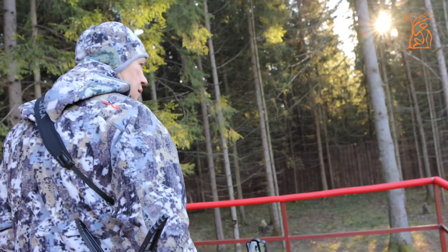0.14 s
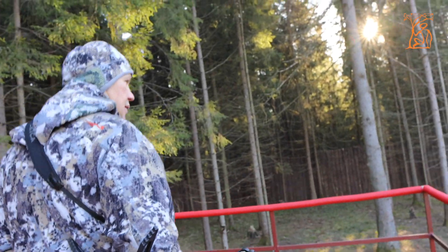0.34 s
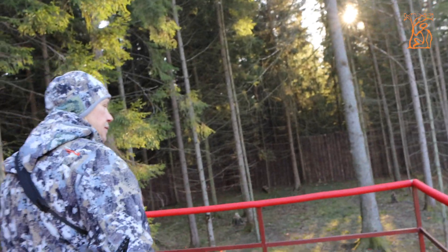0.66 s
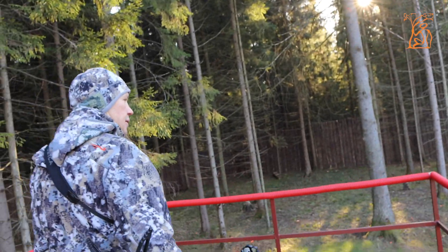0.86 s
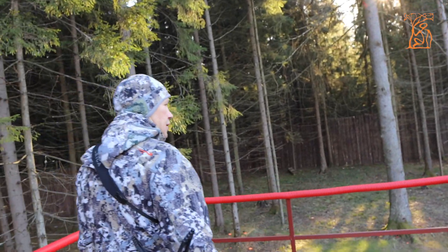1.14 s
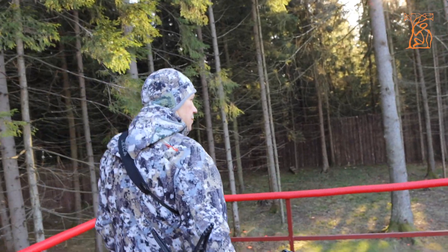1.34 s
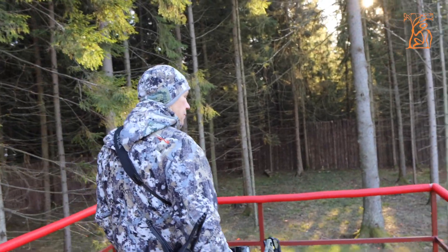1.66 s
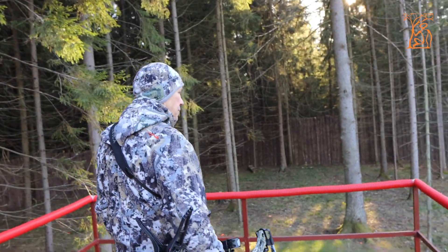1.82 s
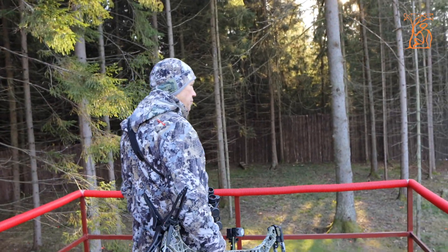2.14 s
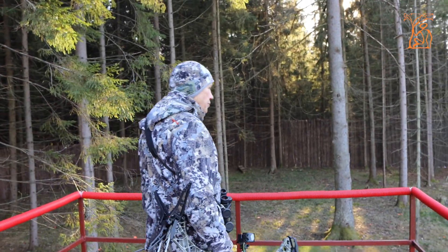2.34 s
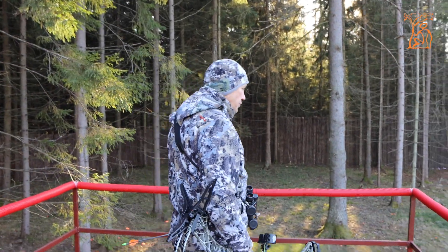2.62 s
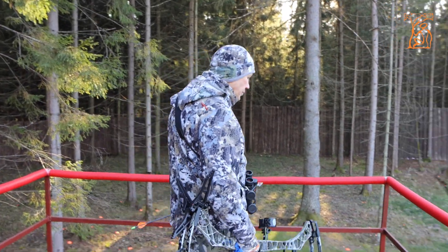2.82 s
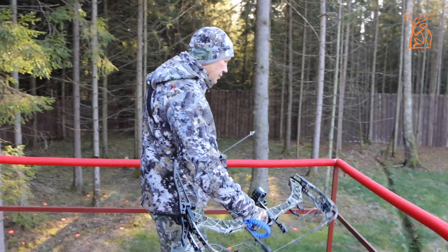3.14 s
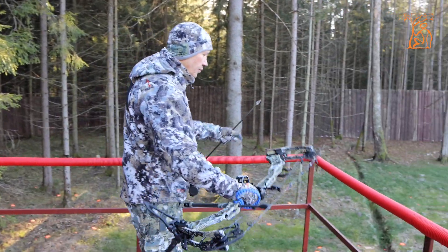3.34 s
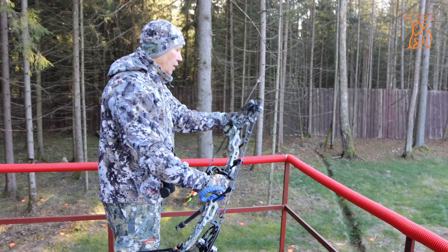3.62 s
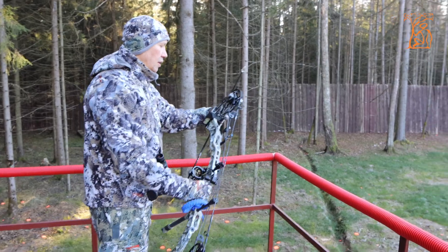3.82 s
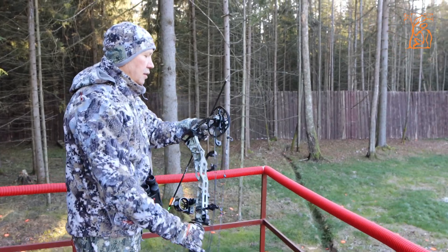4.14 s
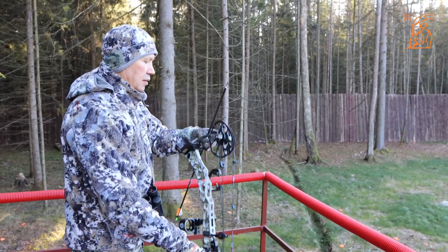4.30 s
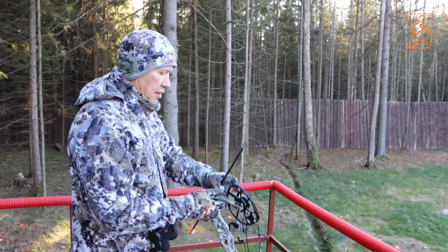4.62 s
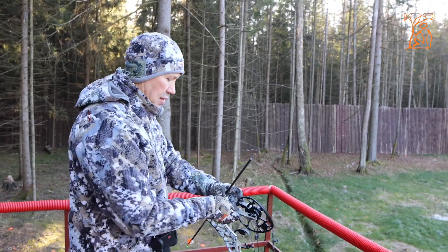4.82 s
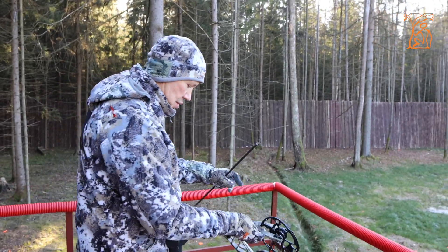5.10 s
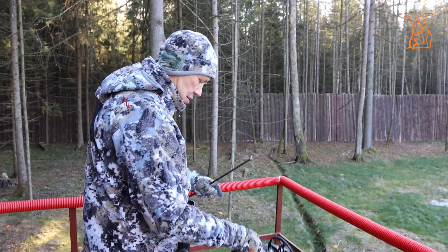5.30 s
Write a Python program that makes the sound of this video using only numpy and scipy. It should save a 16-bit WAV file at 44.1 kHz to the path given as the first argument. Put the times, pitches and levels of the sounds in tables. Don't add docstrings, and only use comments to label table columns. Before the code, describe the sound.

Irregular knocks, ticks and scuffs of boots and equipment on boards among trees, as a distant bang's echo fades beneath.

```python
import sys
import numpy as np
from scipy import signal
from scipy.fft import rfft, irfft, next_fast_len
from scipy.io import wavfile
from scipy.ndimage import uniform_filter1d, minimum_filter1d

SR = 44100
rng = np.random.default_rng(int(sys.argv[2]) if len(sys.argv) > 2 else 0)


def invert_db(level):
    return 10 ** (np.asarray(level, dtype=float) / 20)


def to_wav(sig):
    pcm = np.clip(np.atleast_2d(sig), -1, 1) * 32767
    pcm = np.round(pcm).astype(np.int16)
    wavfile.write(sys.argv[1], SR, pcm.T)


N = 240653

EDGES = 22 * 2 ** np.arange(0, 9.6, .5)
DULL_HZ = 1500
# t/s, peak level/dB,
# f/Hz, t60/s
THUDS = [(0.395, -16.5, 92, 0.1), (0.551, -7, 145, 0.058), (1.421, -22, 273, 0.27),
         (1.767, -18, 125, 0.096), (1.907, -12, 110.5, 0.052), (1.987, -16, 72.4, 0.046),
         (3.212, -31, 99.6, 0.12), (4.206, -21, 121, 0.078), (4.214, -13, 85, 0.076),
         (4.237, -19.5, 266, 0.1), (4.259, -24, 104, 0.062), (4.354, -16.5, 95.3, 0.15),
         (4.373, -7.5, 147, 0.031), (4.387, -29, 105, 0.12), (4.423, -20, 143, 0.16),
         (4.748, -19.5, 96, 0.14), (4.85, -11, 74, 0.058), (4.601, -19.5, 61, 0.13), (4.978, -27, 67, .15)]


def rms_one(x):
    return x / np.sqrt(np.mean(x ** 2) + 1e-20)


def at_hz(points, hz):
    table_hz, value = np.transpose(points)
    return np.interp(np.log(hz), np.log(table_hz), value)


def drift(rate):
    r = np.exp(-80 * np.pi * rate / SR)
    noise = rng.standard_normal(N // 40 + 2002)
    slow = signal.lfilter([1], [1, -2 * r, r * r], noise)[2000:]
    return np.interp(np.arange(N) / 40, np.arange(len(slow)), rms_one(slow))


def band(x, low, high):
    return signal.sosfilt(signal.butter(2, [low, high], "band", fs=SR, output="sos"), x + 1e-18)


def spread(pair, hz):
    # f/Hz, likeness [0-1]
    likeness = [(30, 1), (70, 0.99), (130, 1), (250, 0.97), (600, 0.9), (1400, 0.56), (2800, 0.43),
                (5000, 0.49), (12000, 0.57)]
    alike = np.clip(at_hz(likeness, hz), 0, 1)
    shared = np.sqrt(1 + alike) * pair[0]
    opposed = np.sqrt(1 - alike) * pair[1] * [[1], [-1]]
    return (shared + opposed) / np.sqrt(2)


def grit(shape, spread_db):
    size_db = spread_db * np.minimum(rng.exponential(1, shape[-1]), 5)
    return rng.standard_normal(shape) * invert_db(size_db)


def layer_gain(spectrum, hz, low, high):
    gains = invert_db(at_hz(spectrum, hz))
    lift = np.sqrt(1 + (np.tan(np.pi * hz / SR) / np.tan(np.pi * DULL_HZ / SR)) ** 4)
    inside = (hz > low) & (hz < high)
    power = np.sum((gains ** 2 * hz)[inside]) * 0.7 / SR
    return lift * gains / np.sqrt(power)


def backgrounds():
    # t/s, level/dB
    bang = [
        (0.0, -15.5),
        (0.11, -12),
        (0.135, -17),
        (0.46, -20),
        (0.7, -24.5),
        (1.22, -29),
        (1.7, -32),
        (2.4, -44),
        (5.457, -70),
    ]
    bang_top_db, bang_top_loss_db_per_s, bang_top_tilt_db = -10, 9.5, -19.5
    # t/s, effort level/dB, crispness of the folds/dB
    motion = [(0.0, -54.5, 17), (0.6, -52, 6), (0.85, -63.5, 4), (1.1, -58, 9.5), (1.36, -49, 8.5),
              (1.7, -60, 8.5), (1.9, -37.5, -8), (2.3, -44.5, 1.5), (2.46, -52.5, -4), (2.8, -50, 8.5),
              (3.1, -60.5, 4), (3.262, -65.5, 17), (3.33, -44.5, 5.5), (3.79, -44.5, -8), (3.83, -45, -7),
              (4.28, -46, 3), (4.73, -53, -2.5), (5.457, -63.5, 9)]
    # f/Hz, density/dB
    rumble_spectrum = [(13, -34), (22, -14.5), (44, 0), (212, -4.5), (341, -12), (433, -16.5), (494, 0),
                       (594, -28), (1460, -62), (1710, -34.5), (12000, -58.5), (15600, -96.5),
                       (22000, -120)]
    # f/Hz, density/dB
    echo_spectrum = [(71, -48.5), (120, -22), (221, -10.5), (452, 3), (625, 0), (767, -2.5), (924, -3.5),
                     (2320, -27), (7000, -76), (9100, -88.5), (15400, -120)]
    # f/Hz, density/dB
    rustle_spectrum = [(500, -14), (1100, 9), (2000, 3.5), (3200, -6.5), (4500, -9.5), (7000, -23),
                       (12000, -32), (16000, -54.5)]
    rumble_db, creak_db, woods_db = -34.5, 7.5, -40.5
    drag_hz, drag_db = 2820, 3

    t = np.arange(N) / SR
    bang_db = np.interp(t, *np.transpose(bang))
    s, *columns = np.transpose(motion)
    effort_db, crisp_db = [np.interp(t, s, c) for c in columns]
    low_gain = np.hypot(invert_db(rumble_db), shudder())
    mid_gain = np.sqrt(invert_db(bang_db) ** 2 + invert_db(effort_db + creak_db) ** 2 + invert_db(woods_db) ** 2)
    top_db = bang_db + bang_top_db - bang_top_loss_db_per_s * t

    hz = np.sqrt(EDGES[1:] * EDGES[:-1])
    rumble = layer_gain(rumble_spectrum, hz, 40, 250)
    echo = layer_gain(echo_spectrum, hz, 350, 1100)
    rustle = layer_gain(rustle_spectrum, hz, 1500, 3500)
    smooth = rng.standard_normal((2, 2, N))
    cloth = rms_one(grit((2, 2, N), spread_db=1.5)) * invert_db(2.06 * drift(50))
    out = 0
    for k, centre in enumerate(hz):
        far = np.hypot(rumble[k] * low_gain, echo[k] * mid_gain * invert_db(-2.0))
        far = far * invert_db(0.68 * drift(11))
        share = np.clip(np.log2(centre / 2800), 0, 1)
        folds = np.hypot(invert_db(effort_db + share * crisp_db), invert_db(top_db + share * bang_top_tilt_db))
        treble_share = np.clip(np.log2(centre / 1100) / 1.7, 0, 1.3)
        sing_db = drag_db * np.exp(-(np.log2(centre / drag_hz) / .6) ** 2)
        near = rustle[k] * np.hypot(folds * invert_db(-2.5), scuffing(treble_share) * invert_db(sing_db))
        noise = smooth[k % 2] * far + cloth[k % 2] * near
        out = out + spread(band(noise, *EDGES[k:k + 2]), centre)
    return signal.sosfilt(signal.butter(2, DULL_HZ, fs=SR, output="sos"), out)


def knocks():
    # t/s, peak level/dB,
    # hollowness/dB, crispness/dB, t60/s
    blows = [(0.0004, -24.5, 4, -1.5, 0.036), (0.4075, -19, 2.5, -33, 0.021),
             (0.5472, -6.5, 7.5, -15, 0.025), (0.5524, -20, 2, -4, 0.045), (1.3134, -22, -1, -15, 0.056),
             (1.4282, -12.5, -2, -24.5, 0.05), (1.4344, -19.5, 2, -9, 0.015),
             (1.7229, -25.5, -3, -11.5, 0.049), (1.8587, -18.5, -1, -13, 0.052),
             (2.0074, -18, -32, -6.5, 0.03), (2.1454, -3.5, -8.5, -12, 0.041),
             (2.151, -1, -11.5, -20.5, 0.047), (2.1864, -14.5, -11, -12, 0.059),
             (2.1909, -17.5, -10, -4.5, 0.023), (2.2213, 3.5, -17, -21.5, 0.021),
             (2.2284, -10.5, -5, -16, 0.049), (2.7132, -8, -10.5, -17.5, 0.072),
             (3.3403, -20, -8.5, -15, 0.031), (3.3578, -24, -19, -17.5, 0.069),
             (3.5885, -5, -14.5, -6.5, 0.027), (4.1824, -14.5, 0.5, -15, 0.081),
             (4.1902, -14, -14, -13.5, 0.021), (4.1964, -10.5, 2, -14, 0.031),
             (5.4138, -17.5, -14, -9, 0.061)]
    # t/s, peak level/dB, hollowness/dB, crispness/dB
    ticks = [(0.5036, -28, 1.5, -30), (0.5344, -26, 6, -21), (0.579, -21, 3.5, -21),
             (0.6322, -27.5, -2, -18), (1.0783, -32, 8.5, -12), (1.0941, -40, 16, -9.5),
             (1.1824, -33, 13, -13.5), (1.344, -26.5, -4, -11.5), (1.3813, -27.5, 3, -9),
             (1.72, -20.5, 7, -16.5), (1.8377, -33.5, -1, -11), (2.0141, -17, -31, -16.5),
             (2.0215, -25.5, -10, -7.5), (2.2054, -25.5, 4, -4.5), (2.404, -30, -9, -22),
             (2.4638, -30.5, -0.5, -4), (2.4688, -29.5, -14, -12.5), (2.688, -25.5, -27, -18),
             (2.7435, -28, 1, -14), (3.27, -26.5, -25, -19.5), (3.3856, -30.5, 5.5, -15),
             (3.4164, -32, -16, -12), (3.5214, -28, -14, -6), (3.5468, -23.5, -6, -5.5),
             (4.0916, -24.5, -4.5, -11), (4.1017, -37.5, -5, -19), (4.2072, -21, 2, -14),
             (4.5264, -38, -1, -7), (4.9204, -45, -16, -1), (5.4274, -23.5, 4, -27)]
    # f/Hz, level/dB
    board = [(150, -2), (350, -3), (700, 5), (1500, 1), (2600, -2.5), (4000, 0), (6500, -10),
             (11000, -21.5), (16000, -27.5)]
    tick_t60_s, body_hz = 0.049, 900

    length = int(.1 * SR)
    t = np.arange(length) / SR
    contacts = list(blows) + [(*row, tick_t60_s) for row in ticks]
    grains = np.array([rms_one(grit((2, length), spread_db=-1.0)) for row in contacts])
    grains[:, 0, 4] = -invert_db(22.5)
    uneven_db = rng.normal(0, 0.99, (len(contacts), len(EDGES)))
    out = 0
    for k, (low, high) in enumerate(zip(EDGES, EDGES[1:])):
        hz = np.sqrt(low * high)
        if low < 160:
            continue
        push = np.zeros((2, N + length))
        body_db = 1.2 * np.exp(-(np.log2(hz / body_hz) / 0.2) ** 2)
        swell = 1 - np.exp(-t * hz / 0.23)
        for (s, db, low_db, high_db, t60), grain, own_db in zip(contacts, grains, uneven_db):
            tilt = [(750, low_db), (1500, 0.0049), (3000, 0), (6000, high_db + 12)]
            colour_db = at_hz(tilt, hz) + at_hz(board, hz)
            ring = np.clip(t60, .005, .2) * (hz / 2000) ** -.6
            level = invert_db(db + colour_db + body_db + own_db[k] - 60 * t / ring)
            push[:, round(s * SR):][:, :length] += swell * level * spread(grain, hz)
        out = out + (-1) ** k * band(push[:, :N], low, high) * np.sqrt(SR / hz) * invert_db(-12.5)
    return out * invert_db([[.4], [-.4]])


def forest(x):
    t60_s = 0.55
    t = np.arange(SR) / SR
    tail = rng.standard_normal((2, SR)) * invert_db(-60 * t / t60_s) * (1 - np.exp(-t / 0.0019))
    dull = signal.butter(1, [300, 3500], "band", fs=SR, output="sos")
    tail = signal.sosfilt(dull, spread(tail, 1500))
    tail = tail / np.sqrt(np.sum(tail[0] ** 2))
    return signal.fftconvolve(x.mean(axis=0)[None], tail, axes=1)[:, :N]


def rings(table, rise_cycles, detune):
    out = np.zeros(N)
    turns = rng.random((len(table), 2))
    for (s, db, hz, t60), turn in zip(table, turns):
        t = np.arange(N - round(s * SR))[:SR // 2] / SR
        pair = np.sin(2 * np.pi * hz * t) + 0.43 * np.sin(2 * np.pi * (hz * detune * t + turn[0]))
        shape = (1 - np.exp(-t * hz / rise_cycles)) * invert_db(db - 60 * t / np.clip(t60, .004, .25))
        out[round(s * SR):][:len(t)] += shape * pair
    return out


def thuds():
    return rings(THUDS, rise_cycles=0.28, detune=1.4) * invert_db([[-1.2], [1.2]])


def shudder():
    level_db, shudder_t60_s = -16, 0.75
    t = np.arange(N) / SR
    power = np.zeros(N)
    for s, db, hz, t60 in THUDS:
        decay = invert_db(db + level_db - 60 * (t - s) / shudder_t60_s)
        power += (t > s) * (t60 / 0.093) ** 2 * decay ** 2
    return np.sqrt(power)


def pings():
    # t/s, peak level/dB, f/Hz, t60/s
    struck = [(0.4075, -13, 1490, 0.016), (2.7135, -21, 900, .04), (3.268, -25.5, 4150, 0.024),
              (3.5194, -25, 3470, .015), (4.183, -21, 820, 0.063), (4.196, -10.5, 892, .04),
              (4.9194, -54, 5570, 0.011), (5.4145, -15, 2980, 0.021), (5.4155, -20.5, 1900, 0.019),
              (5.419, -18, 425, .04), (3.596, -11, 587, 0.036), (3.617, -20.5, 543, .05),
              (0.549, -10.5, 1380, .015)]
    return rings(struck, rise_cycles=0.4, detune=0.73)


def scuffing(treble_share):
    # t/s, length/s, level/dB, treble level/dB
    strokes = [(0.495, 0.034, -37, -3), (0.615, 0.032, -41.5, 2.5), (1.08, 0.011, -37, 0),
               (1.293, 0.0088, -43, 2), (1.337, 0.014, -54, 5), (1.4, 0.034, -47.5, 7),
               (1.849, 0.012, -43, -3), (1.748, 0.103, -36, -11), (1.98, 0.035, -44, 5),
               (2.182, 0.016, -43.5, 9), (2.447, .03, -46.5, 4), (2.698, 0.021, -42.5, 1),
               (3.277, 0.058, -45.5, 5), (3.402, 0.12, -41, -3), (3.54, 0.039, -44.5, 4.5),
               (3.639, 0.18, -44.5, -2.5), (4.09, 0.0076, -39, 5), (4.745, 0.059, -53, 3),
               (1.704, 0.04, -47.5, 6), (5.037, 0.25, -53, -0.5), (5.333, 0.059, -64, 7),
               (3.72, 0.078, -52, 4.5), (1.246, 0.065, -56, 5.5), (2.255, 0.075, -53, 9)]
    gain = np.zeros(N)
    for s, length, db, treble_db in strokes:
        t = np.arange(int((length + .04) * SR)) / SR
        fade_db = -40 * t - 900 * np.maximum(t - length, 0)
        gain[round(s * SR):][:len(t)] += invert_db(db + treble_share * treble_db + fade_db)
    return gain


def snap():
    # t/s, peak level/dB, f/Hz, t60/s
    modes = [
        (3.5884, 8, 2455, 0.012),
        (3.5886, -9, 2884, 0.011),
        (3.5888, -13, 4020, 0.012),
        (3.5888, -22.5, 6970, 0.0068),
        (3.5965, -5.5, 413, 0.054),
    ]
    ring = rings(modes, rise_cycles=5.2, detune=1.12)
    return np.array([np.roll(ring, 4), ring])


def scene():
    forest_db = -21
    contacts = knocks() + pings() + thuds()
    crack = snap()
    tail = invert_db(forest_db) * forest(contacts + 0.28 * crack)
    return contacts + crack + tail + backgrounds()


def starve(x):
    # from f/Hz, level under the masking sound/dB, fall [dB per kHz]
    starved = [
        (5500, -34, .7),
        (8500, -41, .8),
    ]
    hz, _, cells = signal.stft([(x[0] + x[1]) / 2, (x[0] - x[1]) / 2], SR, nperseg=512)
    power = np.abs(cells) ** 2
    masker = uniform_filter1d(power[0, (hz > 1500) & (hz < 6000)].sum(axis=0), size=7)
    bands = power[:, :256].reshape(2, 32, 8, -1).sum(axis=2)
    luck_db = 4.5 * rng.standard_normal((2, 32, len(masker) // 4 + 1))
    luck_db = np.repeat(luck_db, 4, axis=2)[..., :len(masker)]
    under_db = 10 * np.log10(uniform_filter1d(bands, size=3) / masker + 1e-15) + luck_db
    under_db = np.repeat(under_db, 8, axis=1)
    top = power[:, hz > 6300].sum(axis=(0, 1))
    quiet_before = minimum_filter1d(uniform_filter1d(top, size=3), size=11, origin=4)
    attack = top > 9 * quiet_before
    for cell, level_db, (from_hz, limit_db, fall_db) in zip(cells, under_db, starved):
        above = (hz[:256, None] - from_hz) / 1000
        kept = np.clip((level_db - limit_db + fall_db * above) / 2, 0, 1)
        cell[:256] *= np.where((above > 0) & ~attack, kept, 1)
    mid, side = signal.istft(cells, SR, nperseg=512)[1][:, :N]
    return np.array([mid + side, mid - side])


def band_limit(x):
    return signal.sosfilt(signal.butter(12, 16390, fs=SR, output="sos"), x)


def record(dry):
    # f/Hz, lead of the left port [radians]
    port_phase = [(0, 0), (1720, .65), (3960, 2.7), (6120, 3.1), (11500, 3.1), (14500, 2.4), (16000, 2.4)]
    size = next_fast_len(N + 4096)
    hz, lead = np.transpose(port_phase)
    lead = np.interp(np.arange(size // 2 + 1) * SR / size, hz, lead)
    turn = np.exp(.5j * lead * [[1], [-1]])
    ports = irfft(rfft(dry, size) * turn, size)[:, :N]
    mix = starve(1.357 * np.tanh(ports / 1.223))
    return band_limit(mix)


dry = scene()
out = record(dry)
to_wav(out)
```